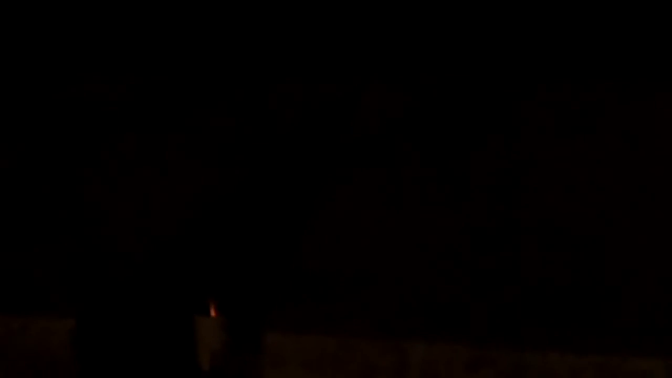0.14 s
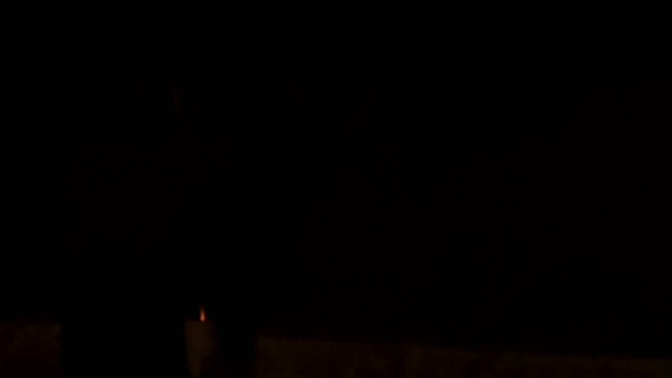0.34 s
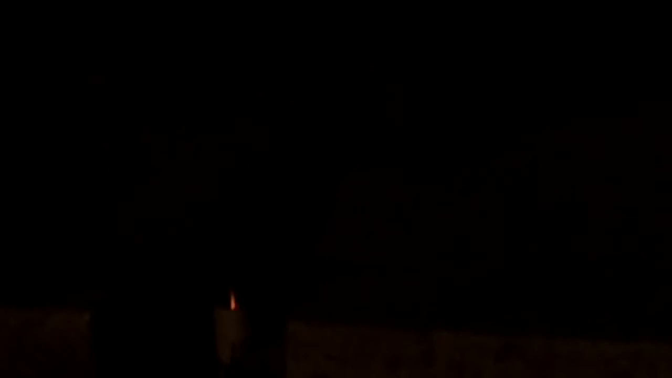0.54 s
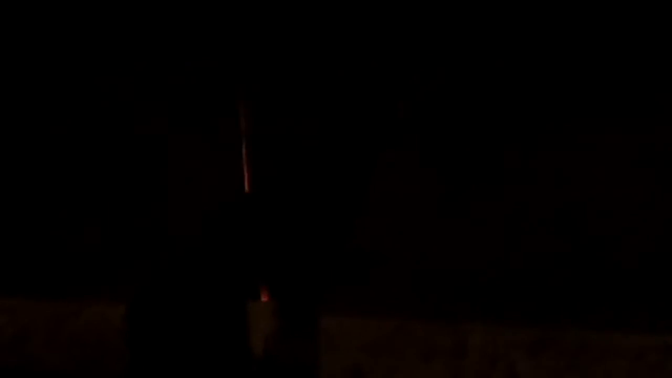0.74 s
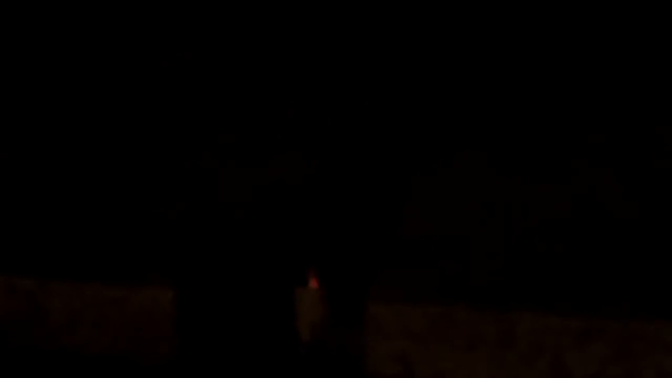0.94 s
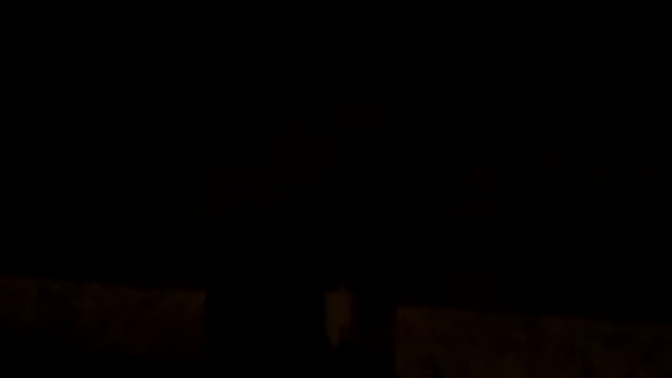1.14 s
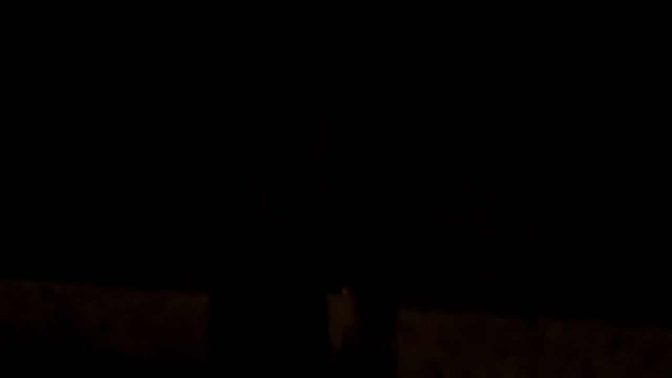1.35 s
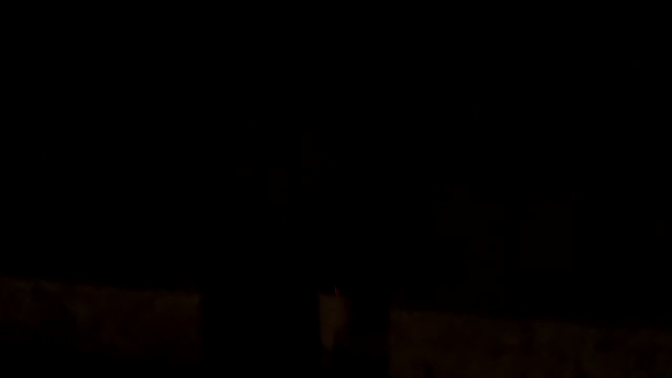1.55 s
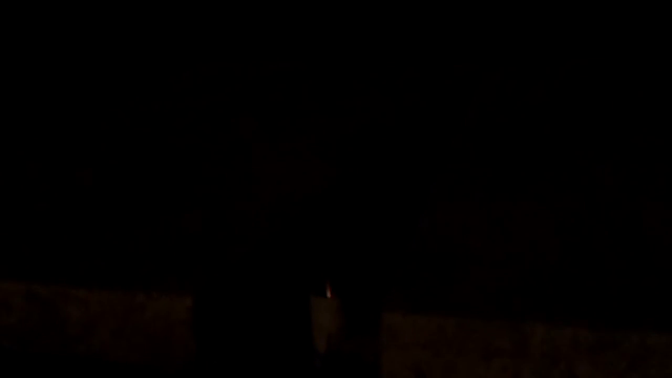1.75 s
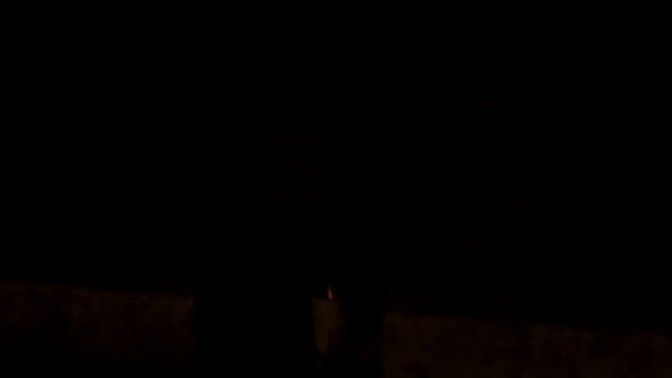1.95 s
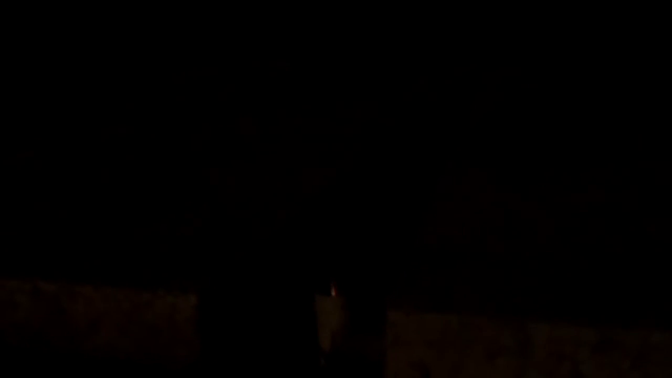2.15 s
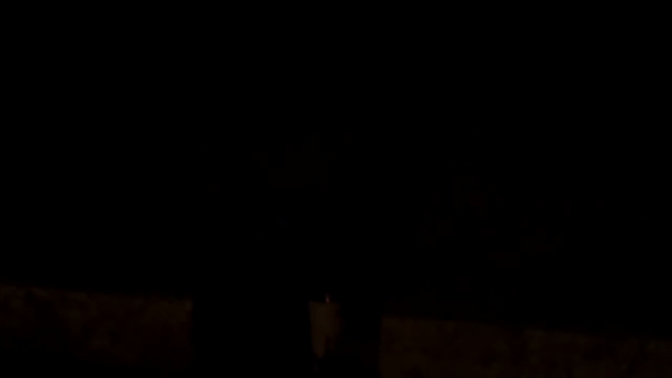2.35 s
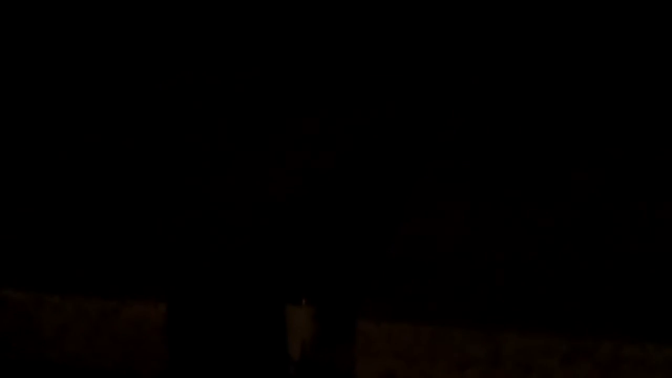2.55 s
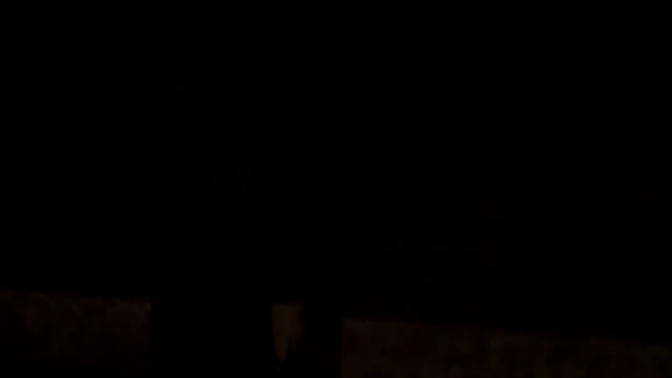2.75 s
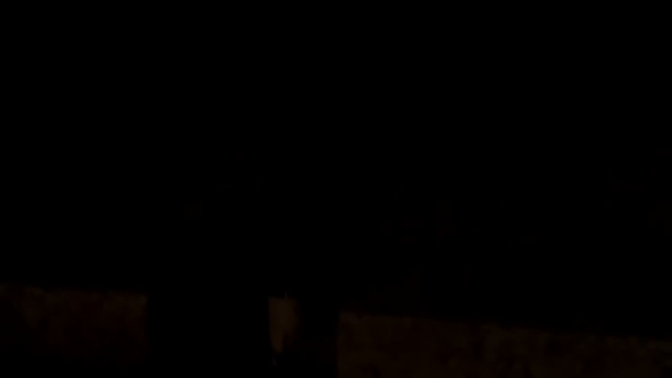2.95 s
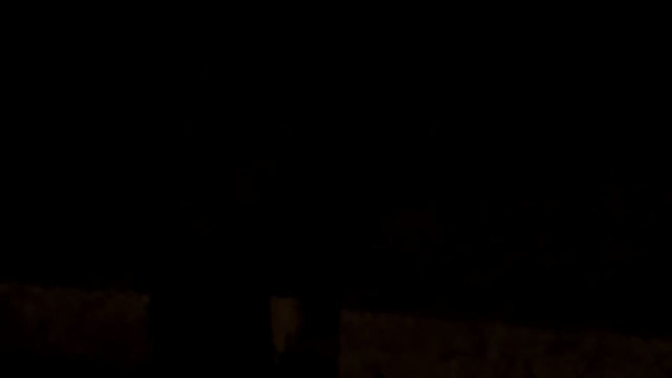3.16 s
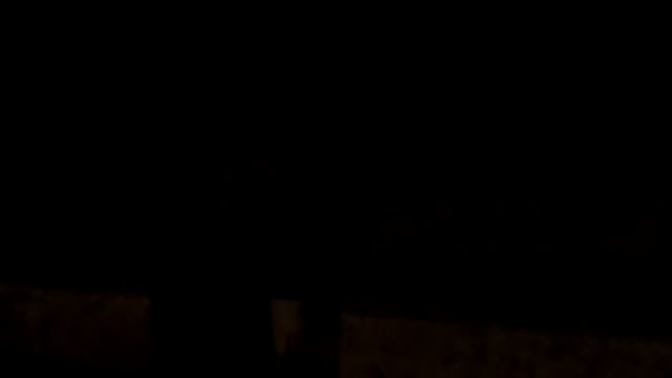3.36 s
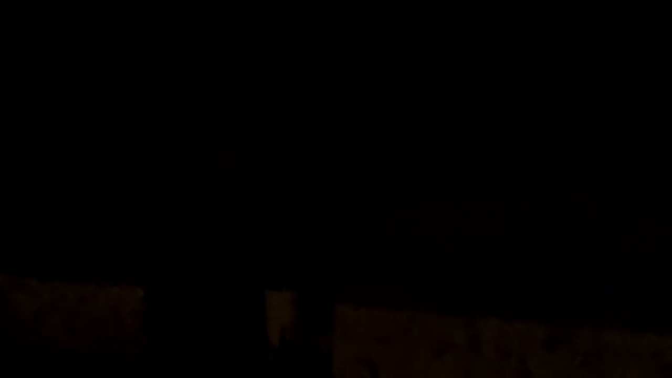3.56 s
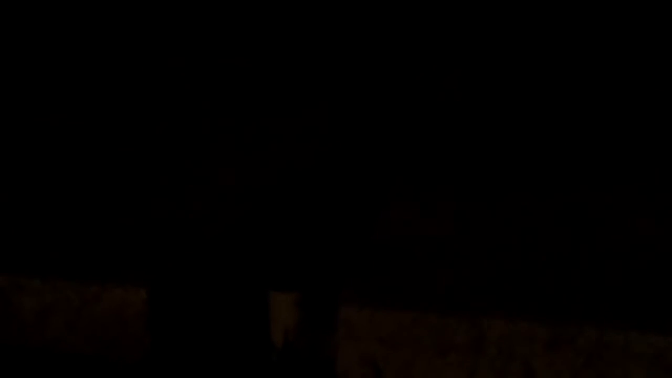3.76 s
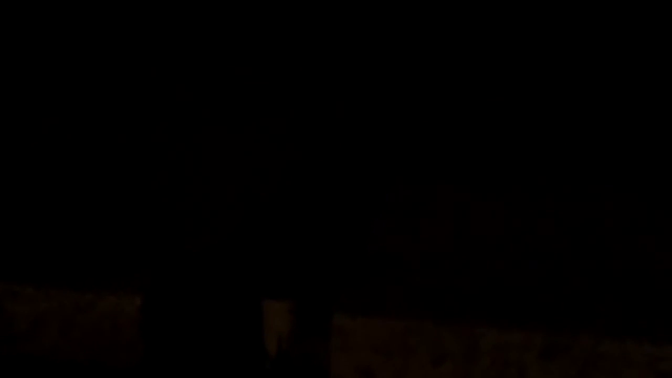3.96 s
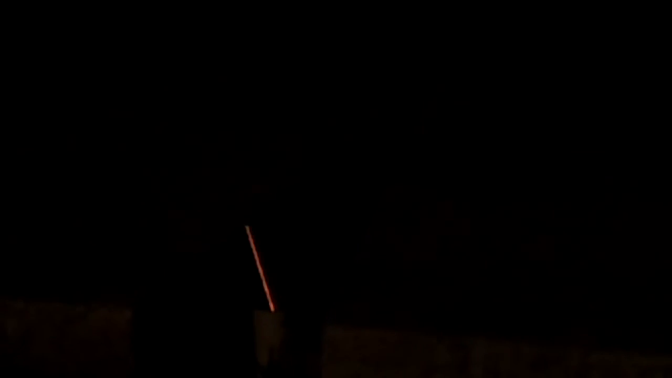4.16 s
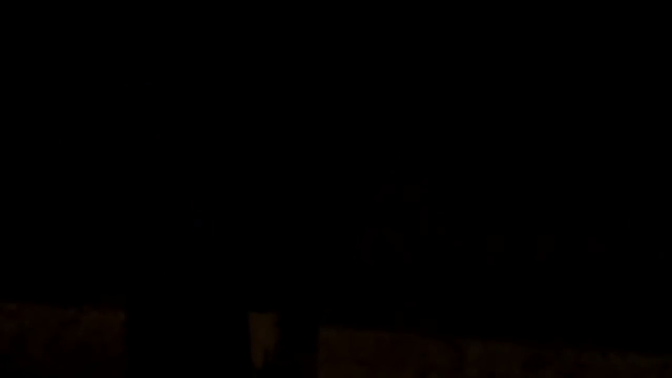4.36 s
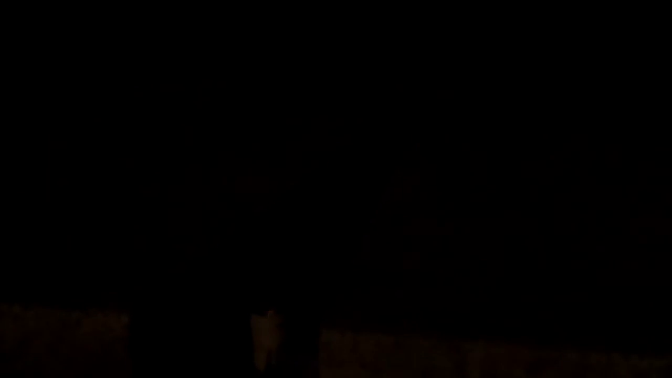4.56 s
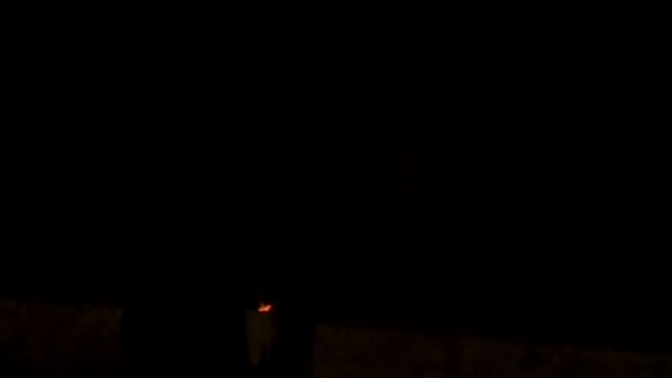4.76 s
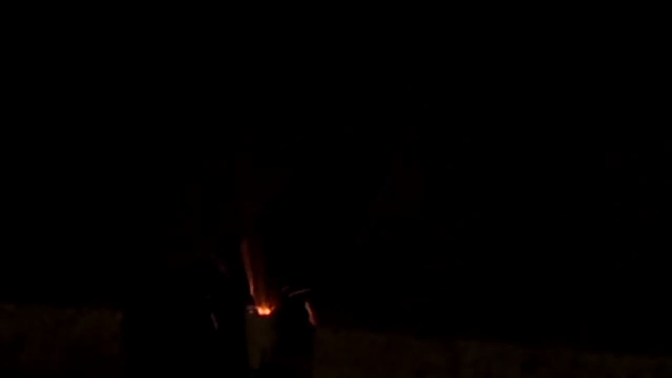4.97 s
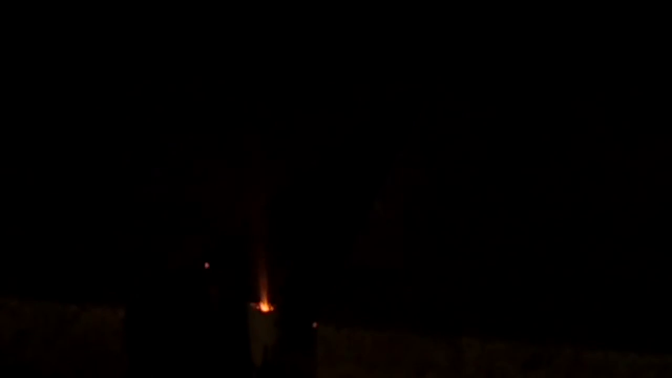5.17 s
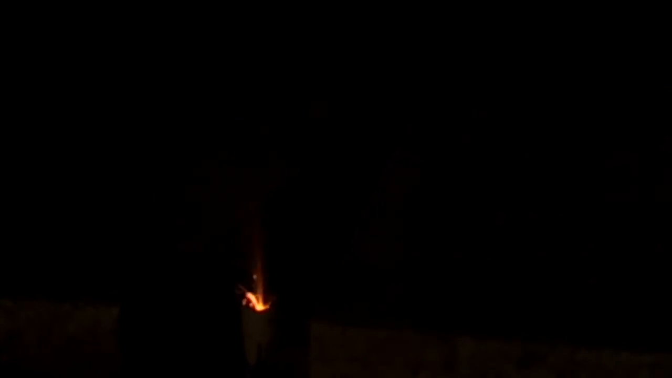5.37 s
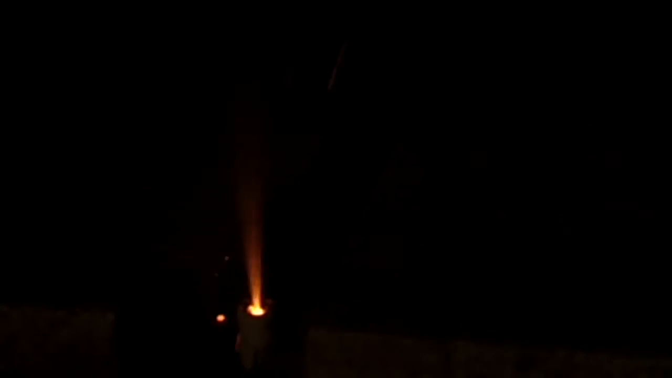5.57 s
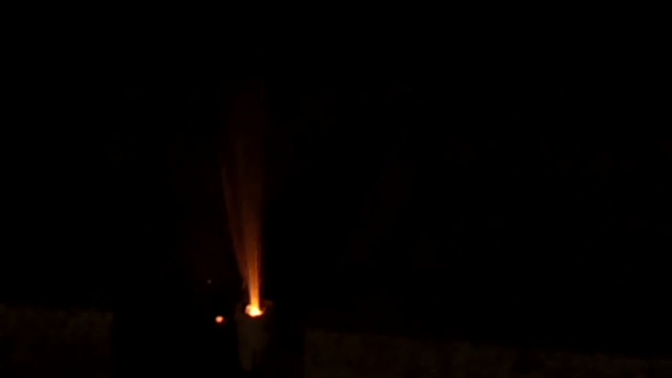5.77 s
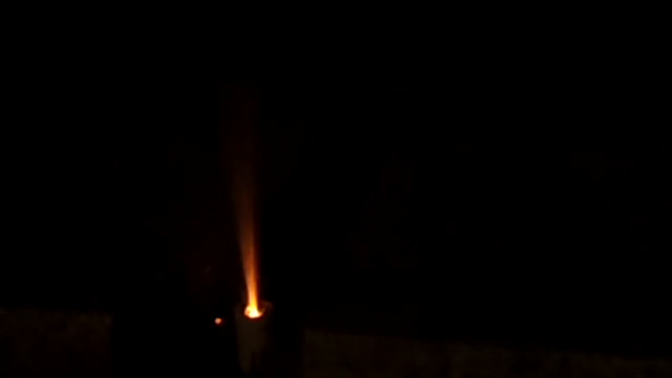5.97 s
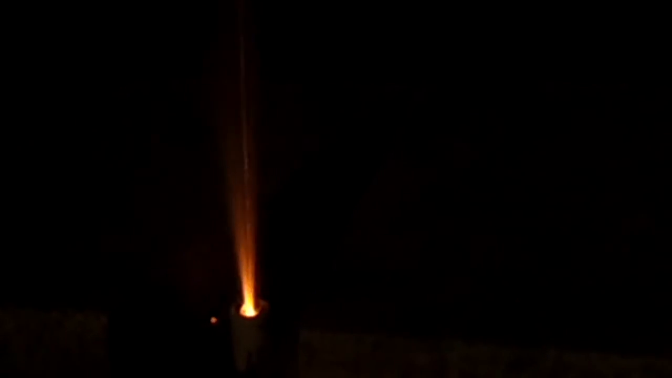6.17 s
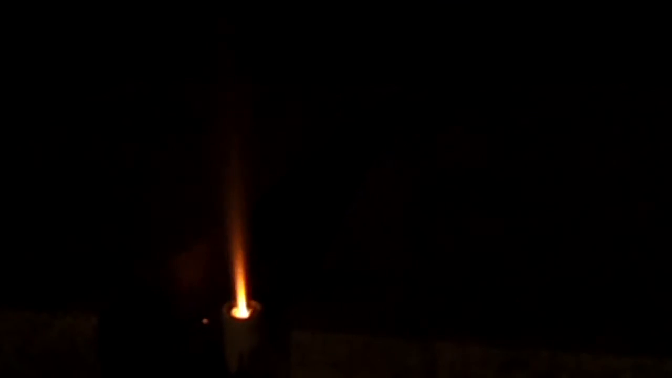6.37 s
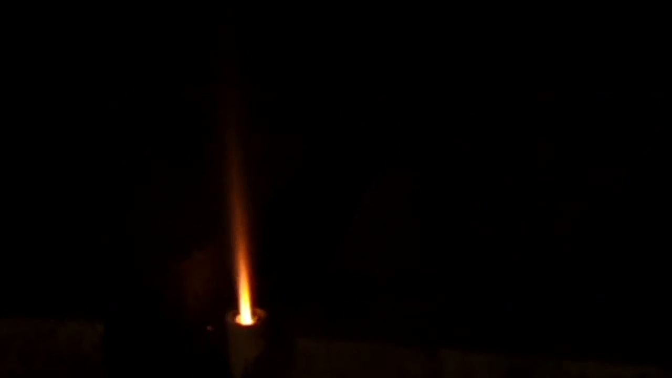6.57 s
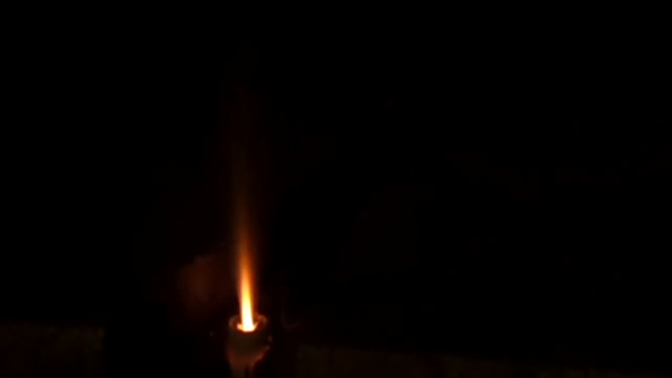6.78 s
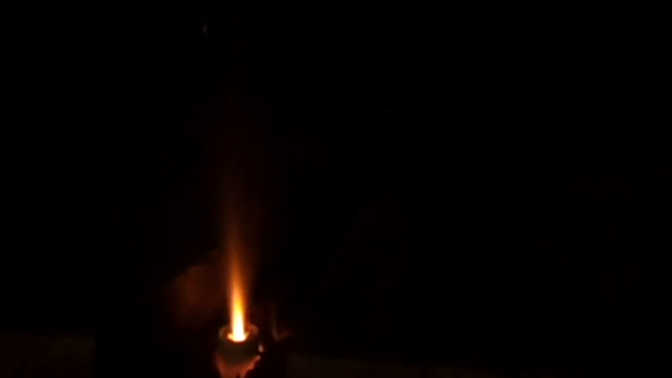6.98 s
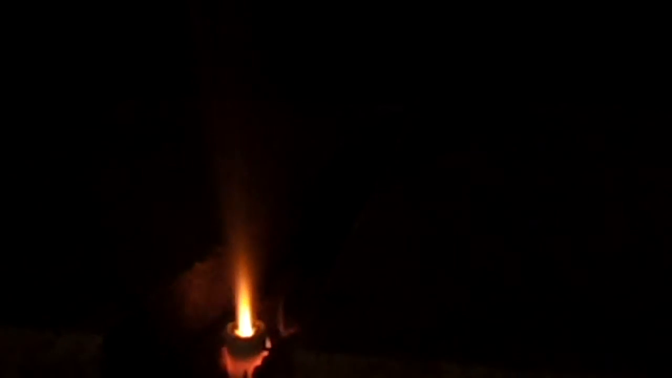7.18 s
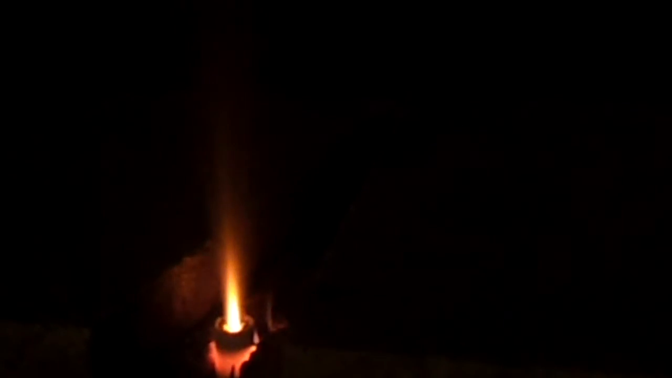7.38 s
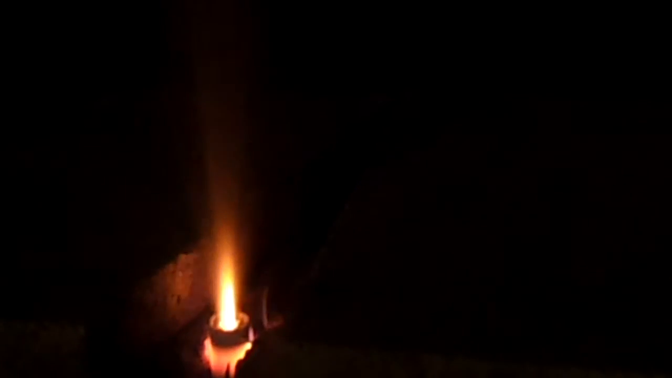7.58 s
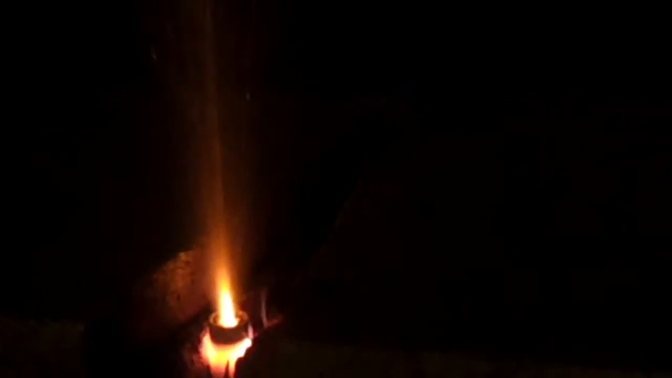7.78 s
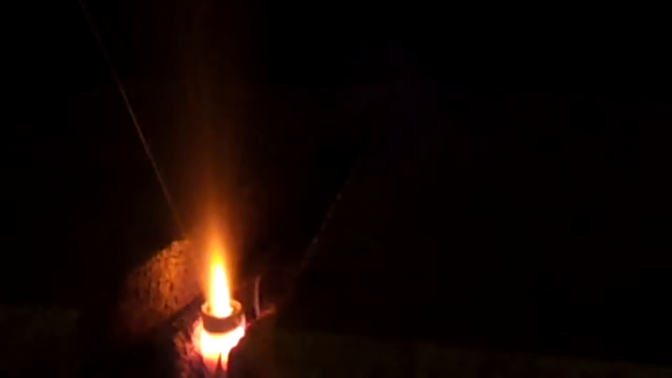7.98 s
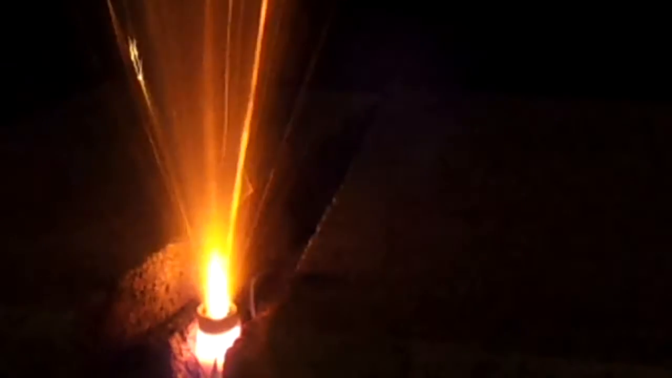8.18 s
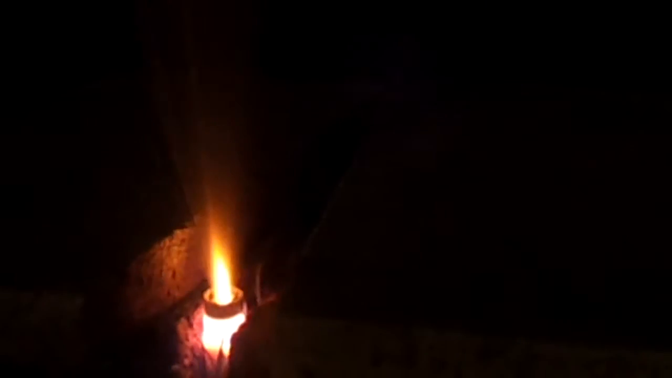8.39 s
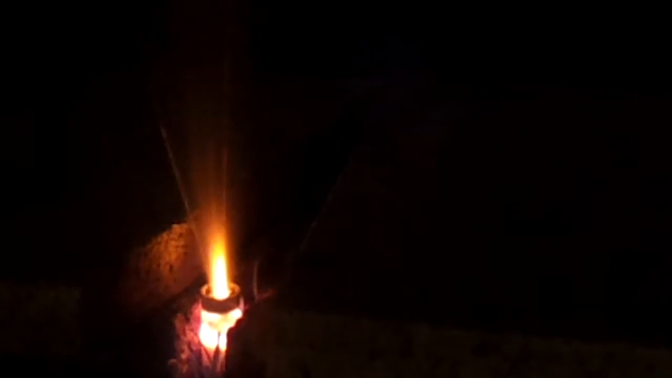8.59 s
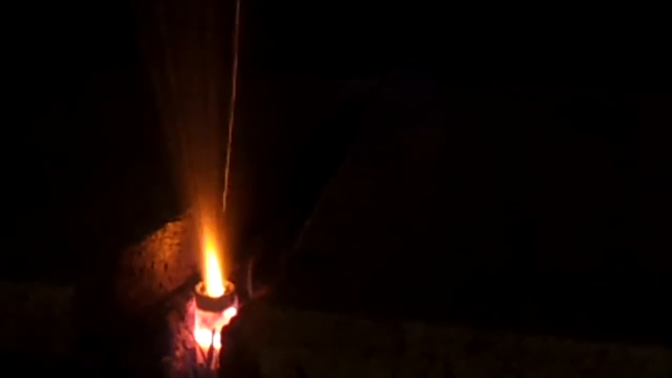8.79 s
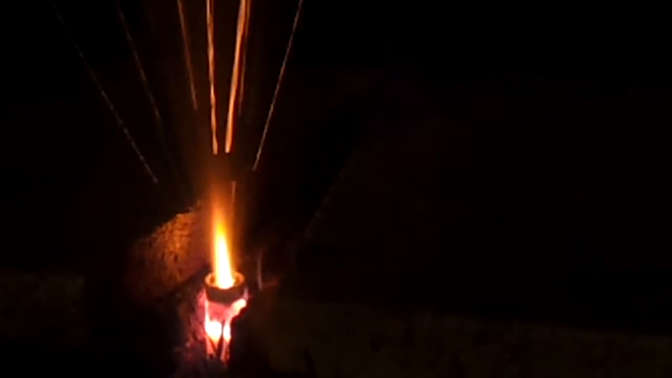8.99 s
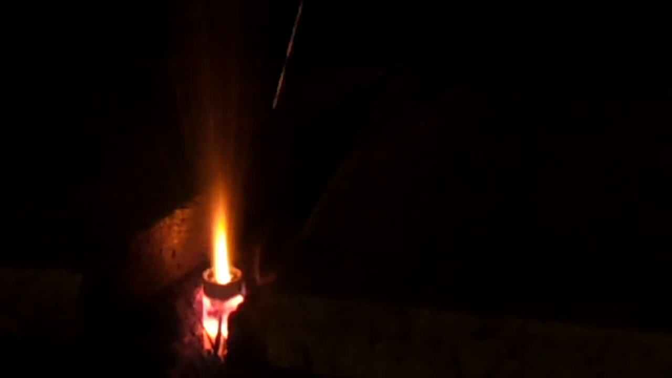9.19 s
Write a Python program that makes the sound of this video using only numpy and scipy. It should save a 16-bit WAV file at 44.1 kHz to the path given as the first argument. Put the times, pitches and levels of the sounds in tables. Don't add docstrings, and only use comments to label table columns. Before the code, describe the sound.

Faint airy hissing over distant traffic rises through sharp pops into a very loud, distorted, steady rushing roar that thumps and crackles to the end.

```python
import sys
import numpy as np
from scipy import signal
from scipy.fft import rfft, irfft
from scipy.io import wavfile
from scipy.ndimage import uniform_filter1d

SR = 44100
rng = np.random.default_rng(int(sys.argv[2]) if len(sys.argv) > 2 else 0)


def amplitude_ratio(level_db):
    exponent = np.asarray(level_db, float) / 20
    return 10 ** exponent


def output_pcm(signal):
    pcm = np.clip(np.atleast_2d(signal).T, -1, 1) * 32767
    wavfile.write(sys.argv[1], SR, np.round(pcm).astype(np.int16))


N = 407043
HZ = np.fft.rfftfreq(512, 1 / SR)
T = np.arange(N // 128 + 5) * 128 / SR


def evened(x):
    return x / np.sqrt(np.mean(x ** 2) + 1e-20)


def read(points, hz):
    f, value = np.transpose(points)
    return np.interp(np.log(hz + 1), np.log(f + 1), value)


def columns(rows, t):
    s, *rest = np.transpose(rows)
    return [np.interp(t, s, c) for c in rest]


def late(x, s):
    return np.pad(x, (round(s * SR), 0))[:N]


def chance(frames, bins):
    field = rng.standard_normal((len(T), len(HZ)))
    field = uniform_filter1d(field, frames, 0)
    return evened(uniform_filter1d(field, bins, 1))


def noise(shape_db, level_db, lo_hz, hi_hz):
    gain = amplitude_ratio(shape_db)
    in_band = (HZ > lo_hz) & (HZ < hi_hz)
    band = np.sqrt((gain[:, in_band] ** 2).sum(1, keepdims=True))
    z = rng.standard_normal(gain.shape) + 1j * rng.standard_normal(gain.shape)
    z *= gain / band * amplitude_ratio(level_db) * np.sqrt(1.5)
    return signal.istft(z.T, nperseg=512, noverlap=384)[1][:N]


def shock(hz):
    t = np.arange(-40, 41) / SR
    return np.exp(-.5 * (t * hz / 0.44) ** 2) * np.cos(2 * np.pi * hz * t + .5)


# (frequency [Hz], level [dB per Hz])
NIGHT_COLOUR = [(5.9, -25.5), (10, -3), (22, -12.5), (107, -4), (129, -5), (145, -9.5), (179, -11.5),
                (211, -16.5), (465, -23.5), (534, -22), (913, -16), (1970, -26.5), (2600, -31), (3380, -44),
                (5720, -120)]
# (start [s], length [s], first pitch [Hz], last pitch [Hz], level [dB])
DRONES = [(0, 0.75, 163, 164, -52.5), (.6, 0.79, 168, 170, -61), (.7, 0.85, 180, 183.7, -62),
          (0.1, 1.46, 82, 85.3, -55.5), (.25, .45, 116, 117, -55), (1.9, 1.1, 116, 114.6, -57.5),
          (2.95, 2.46, 116.4, 116.9, -49.5), (2.1, .55, 92, 92.5, -51.5), (2.2, .55, 182, 182, -57.5),
          (3.3, 0.43, 96, 91.3, -50), (4.35, 0.63, 92, 91, -57), (5.35, .25, 94, 93, -47)]
NIGHT_DB, DRONE_FADE_S = -47.5, .1


def night():
    t = np.arange(N) / SR
    colour = amplitude_ratio(read(NIGHT_COLOUR, np.fft.rfftfreq(N, 1 / SR)))
    wash = irfft(rfft(rng.standard_normal(N)) * colour, N)
    out = amplitude_ratio(NIGHT_DB) * evened(wash)
    for start, length, first_hz, last_hz, db in DRONES:
        hz = np.interp(t, [start, start + length], [first_hz, last_hz])
        fade = np.clip(np.minimum(t - start, start + length - t) / DRONE_FADE_S, 0, 1)
        out = out + np.sqrt(2) * amplitude_ratio(db) * fade * np.sin(2 * np.pi * np.cumsum(hz) / SR)
    return out


# (time [s], peak level [dB], pitch [Hz], low push level [dB])
POPS = [
    (4.9803, -10, 3800, -30),
    (5.1494, -12, 5500, -34),
    (5.1544, -14, 4200, -34),
    (5.432, -17, 2300, -34),
    (5.5383, -8, 3000, -24),
    (5.5388, -2.5, 3600, -19),
]


def pops():
    out, t = np.zeros(N), np.arange(400) / SR
    for s, db, hz, push_db in POPS:
        at = round(s * SR)
        out[at - 40:at + 41] += amplitude_ratio(db) * shock(hz)
        out[at:at + len(t)] -= amplitude_ratio(push_db) * np.sin(2 * np.pi * 400 * t) * np.exp(-t / 0.0017)
    return out


# (time [s], peak level [dB], pitch [Hz])
THUDS = [(6.812, -9, 650), (7.565, -14, 377), (7.605, -12, 417), (7.849, -6.5, 388), (7.978, -6, 686),
         (8.174, -10, 751), (8.514, -7, 450), (8.666, -7, 689), (8.72, -13.5, 288), (8.965, -4, 894),
         (9.022, -6, 430), (9.058, -8.5, 357), (9.097, -7.5, 417), (9.166, -19, 250)]
THUD_CYCLES, THUD_DB = 0.49, -3


def thuds():
    out, t = np.zeros(N + 800), np.arange(-400, 400) / SR
    for s, db, hz in THUDS:
        at = round(s * SR)
        swell = np.exp(-.5 * (t * hz / THUD_CYCLES) ** 2)
        out[at - 200:at + 600] -= amplitude_ratio(db + THUD_DB) * swell * np.cos(2 * np.pi * hz * t)
    return out[:N]


SHOCKS_PER_S, SHOCK_DB, SHOCK_SPREAD_DB = 45, -11, 2.


def shocks():
    size_db = SHOCK_DB + SHOCK_SPREAD_DB * np.minimum(rng.exponential(1, N), 3)
    size = amplitude_ratio(size_db) * (rng.random(N) < SHOCKS_PER_S / SR)
    kind = rng.integers(0, 4, N)
    out = np.zeros(N)
    for k, hz in enumerate((1300., 1500., 2000., 2400.)):
        out += (-1) ** k * np.convolve(size * (kind == k), shock(hz), "same")
    return thrust() * out


def steepening():
    flicker = uniform_filter1d(rng.standard_normal(N), size=12)
    flicker = evened(uniform_filter1d(flicker, size=12))
    return amplitude_ratio(1.4 * thrust() * np.clip(flicker, -2.5, 2.5))


# (delay [s], level [dB])
GROUND = [
    (.00085, -46),
    (.00325, -28),
]


def reflections(motor):
    return sum(amplitude_ratio(db) * late(motor, s) for s, db in GROUND)


CASING_S, CASING_DB = .0037, -9


def casing(roar):
    band = signal.butter(1, [330, 3000], "bandpass", fs=SR, output="sos")
    dull = signal.sosfiltfilt(band, roar)
    return roar - (1 - thrust()) * amplitude_ratio(CASING_DB) * late(dull, CASING_S)


# (time [s], level [dB])
PLUME = [(3.6, -69), (4.2, -56.5), (4.7, -47.5), (5.1, -41), (5.7, -33), (5.9, -26.5), (6.05, -22.5),
         (6.2, -19.5), (6.58, -18), (7.03, -20.5), (7.6, -18.5), (8.3, -18), (9.23, -19.5)]
# (frequency [Hz], level [dB per Hz])
PLUME_COLOUR = [(20, -18), (60, -3), (200, 0.5), (600, 1.7), (1500, -2), (3000, -3.5), (5000, -10.5),
                (7000, -25), (8000, -10), (10400, -35)]
# (time [s], extra bass of large slow eddies [dB], brightness [dB per octave])
STAGES = [
    (4.7, -10, 1),
    (5.1, -16, -3),
    (5.55, -14, -5),
    (5.85, -7, -2),
    (6.05, -10, -3),
    (6.2, -1, 2.1),
    (6.74, 1, 2.2),
    (7.03, 7.5, 3),
    (9.23, 10, 2.3),
]


def plume():
    level_db, bass_db, tilt_db = (c[:, None] for c in columns(PLUME, T) + columns(STAGES, T))
    level_db = level_db - 30 * np.maximum(PLUME[0][0] - T, 0)[:, None]
    bass = bass_db / (1 + (HZ / 180) ** 2)
    tilt = tilt_db * np.log2(1 + HZ / 1100)
    gusts_db = 0.4 * chance(frames=5, bins=120) + 0.83 * chance(frames=20, bins=8)
    return noise(read(PLUME_COLOUR, HZ) + bass + tilt, level_db + gusts_db, 300, 2000)


# (time [s], level [dB])
JET = [(0.0, -39.5), (.7, -36.5), (1.6, -36), (2.2, -33), (2.5, -34.5), (2.85, -28.5), (3.4, -31.5),
       (3.9, -29), (4.55, -29.5), (5.0, -27.5), (5.6, -22), (5.95, -16), (6.2, -13), (6.6, -11.5),
       (6.9, -11.5), (9.23, -11.5)]


def thrust():
    return np.clip((columns(JET, np.arange(N) / SR)[0] + 15.3) / 2.6, 0, 1)


# (time [s], lift [dB], half width [s])
PUFFS = [(.11, 2, .03), (.51, -2, .02), (.86, -5.5, .025), (.98, 3, .02), (1.03, -2, .015), (1.07, 1, .03),
         (1.4, -3.5, .02), (1.44, 3, .02), (1.485, -2, .015), (1.54, 3, .02), (1.77, 4, .025),
         (1.83, -1.5, .02), (1.97, 2, .02), (2.01, -2, .02), (2.11, 2.5, .04), (2.18, -1.5, .02),
         (2.38, 3, .04), (2.65, 2, .03), (2.77, -1.5, .02), (3.0, 1.5, .03), (3.07, -2, .02),
         (3.45, -2, .03), (3.85, 2.5, .03), (4.04, 2, .025), (4.25, 1.5, .03), (4.43, 2.5, .04),
         (4.98, 2, .02), (5.12, 1.5, .04), (6.01, -1.5, .025), (6.74, -1.3, .04)]


def pressure(t):
    puffs_db = sum(db * np.exp(-.5 * ((t - s) / width) ** 2) for s, db, width in PUFFS)
    return columns(JET, t)[0] + puffs_db


# (frequency [Hz], level [dB per Hz])
JET_COLOUR = [(1060, -67), (1800, -20), (2500, -14.5), (2850, -11), (3150, -5.5), (3600, -4), (4770, -1.5),
              (5800, -2.5), (6630, -1.5), (7380, -5), (8000, -11.5), (10400, -24)]
# (time [s], whistle centre [Hz], whistle height [dB], fizz on top [dB])
NOZZLE = [(0, 5950, 3, 0.5), (1.5, 6040, 6.5, 7), (2.3, 6023, 9.5, 8.5), (2.7, 6200, 10, 3.5),
          (3.4, 5850, 11, 1.5), (4.42, 5200, 6.5, -5), (4.57, 5310, 1.5, -4), (5.1, 5300, -0.5, -3),
          (5.66, 5747, 0.5, -1), (6.2, 6200, 1.5, 0), (9.23, 6180, 2.5, 0)]
# (frequency [Hz], width [Hz], level [dB])
LIP = [
    (6220, 260, 2.5),
    (5250, 300, 1.5),
]
SPUTTER_DB, SPUTTER_PER_WHISTLE = 0.48, 0.11
CRACKLE_DB, CRACKLE_PER_WHISTLE = -9, -2.05


def jet():
    level_db = pressure(T)[:, None] - .4
    hz, lift_db, fizz_db = (c[:, None] for c in columns(NOZZLE, T))
    whistle_db = lift_db * np.exp(-.5 * ((HZ - hz) / 700) ** 2)
    lip_db = sum(db * np.exp(-.5 * ((HZ - f) / width) ** 2) for f, width, db in LIP)
    top_db = fizz_db * np.clip((HZ - 6500) / 1000, 0, 1)
    shape_db = read(JET_COLOUR, HZ) + whistle_db + lip_db + top_db
    sputter = 0.63 * chance(frames=3, bins=200) + 0.36 * chance(frames=14, bins=30)
    sputter_db = (SPUTTER_DB + SPUTTER_PER_WHISTLE * lift_db) * sputter
    hiss = noise(shape_db, level_db + sputter_db, 2500, 8000)

    size = amplitude_ratio(3.5 * np.minimum(rng.exponential(1, N), 3)) * (rng.random(N) < 400 / SR)
    kind = rng.integers(0, 3, N)
    crackle = np.zeros(N)
    for k, f in enumerate((3400., 4400., 5600.)):
        crackle += np.convolve(size * (kind == k), shock(f), "same")
    crackle_db = level_db + CRACKLE_DB + CRACKLE_PER_WHISTLE * lift_db
    return hiss + evened(crackle) * amplitude_ratio(np.interp(np.arange(N) / SR, T, crackle_db[:, 0]))


def scene():
    motor = casing(plume()) + jet()
    burn = (motor + reflections(motor)) * steepening()
    return (burn + night() + pops() + thuds() + shocks())[None]


def roll_off(x):
    return signal.sosfilt(signal.butter(12, 15760, fs=SR, output="sos"), x)


# (time [s], offset [1 = full scale])
DRIFT = [(0, -.001), (6.5, -.001), (7, -.022), (7.6, -.034), (8.2, -.03), (9.23, -.028)]
# (frequency [Hz], level [dB])
SAMPLER = [(7000, 0), (7400, -4), (8000, -14)]
# (frequency [Hz], level [dB])
IMAGE = [(8000, -1), (8400, -11), (9050, -37), (9400, -57), (9700, -110)]
HALF_RATE_HZ, FULL_SCALE, INPUT_RAIL = 8000, .7, .69


def record(dry):
    drift = columns(DRIFT, np.arange(N) / SR)[0]
    x = np.clip(dry[0] * amplitude_ratio(-0.09) + drift, -INPUT_RAIL, INPUT_RAIL)
    size = N + 8192
    bridge = np.linspace(x[-1], x[0], size - N)
    hz = np.fft.rfftfreq(size, 1 / SR)
    z = rfft(np.concatenate([x, bridge])) * amplitude_ratio(read(SAMPLER, hz))
    fold = int(HALF_RATE_HZ * size / SR)
    image = np.conj(z[fold:0:-1]) * amplitude_ratio(read(IMAGE, hz[fold:2 * fold]))
    smooth = irfft(np.concatenate([z[:fold], image]), size)[:N]
    mix = np.clip(smooth, -FULL_SCALE, FULL_SCALE)[None]
    return roll_off(mix)


dry = scene()
out = record(dry)
output_pcm(out)
```